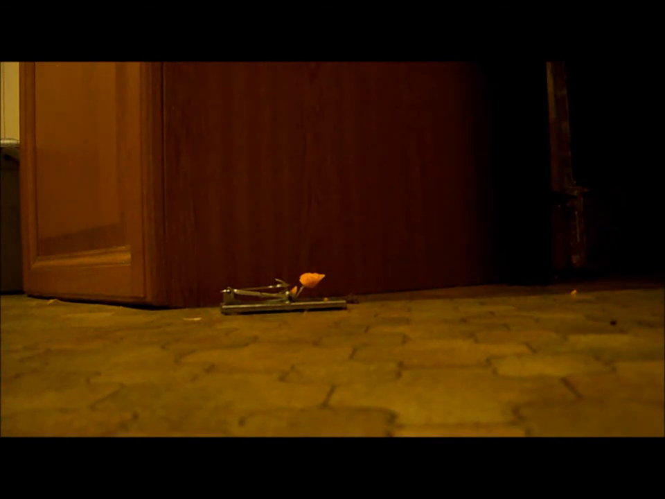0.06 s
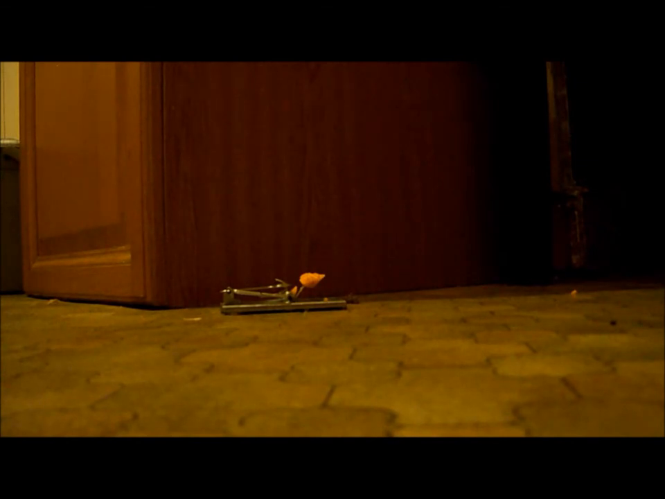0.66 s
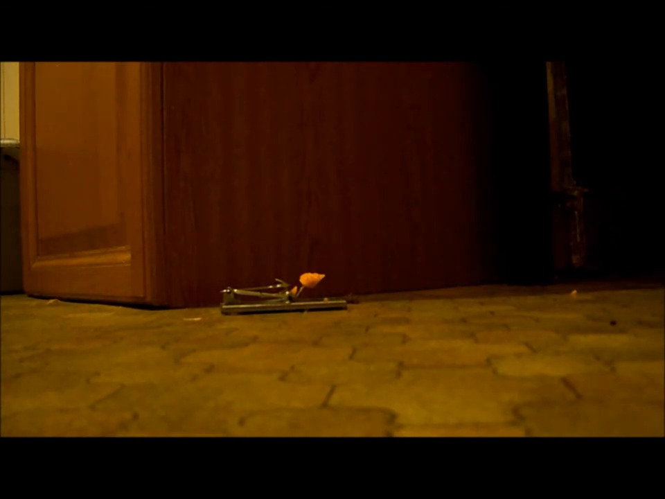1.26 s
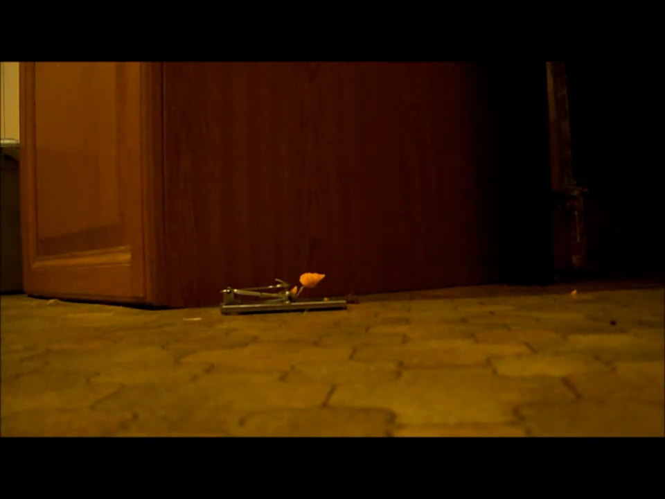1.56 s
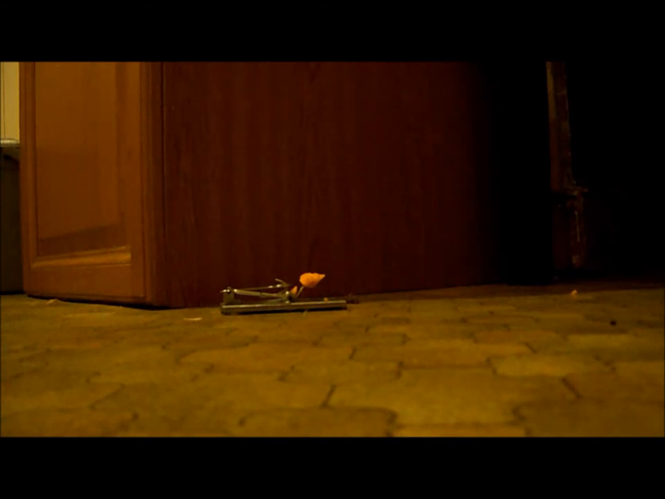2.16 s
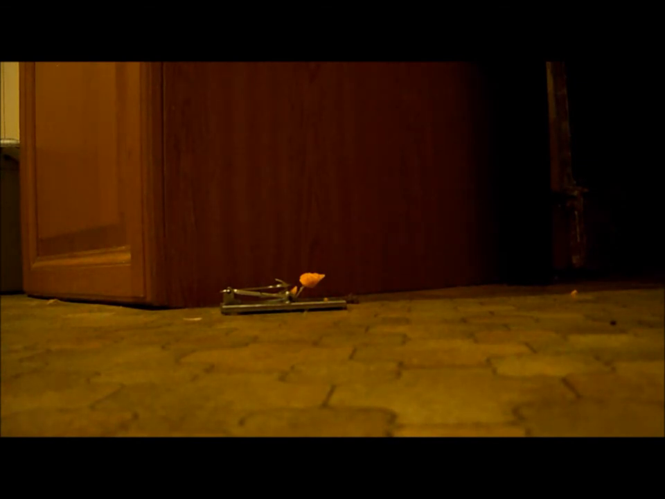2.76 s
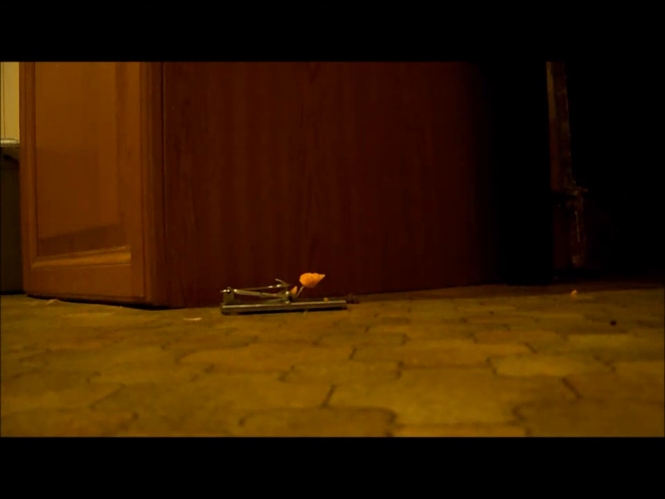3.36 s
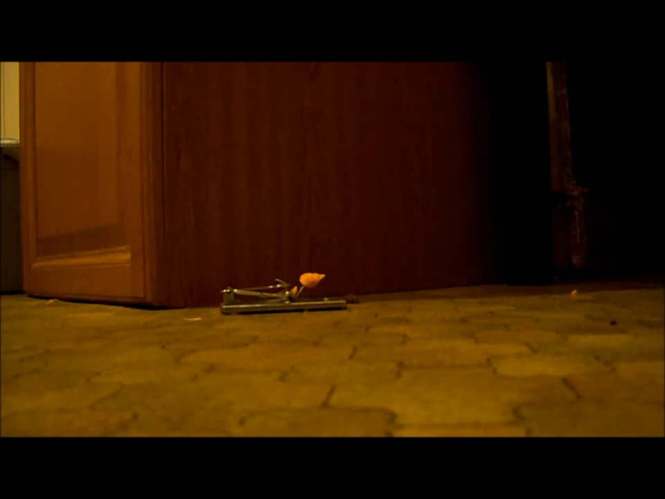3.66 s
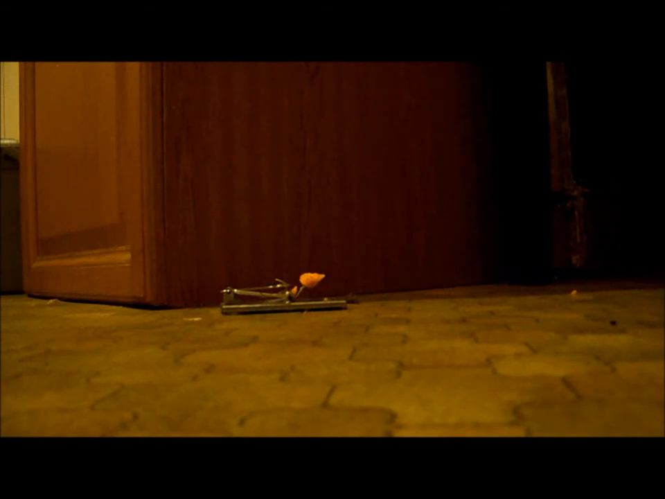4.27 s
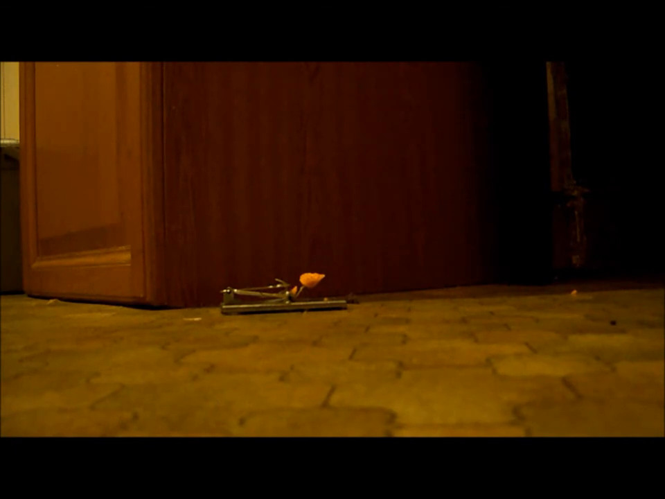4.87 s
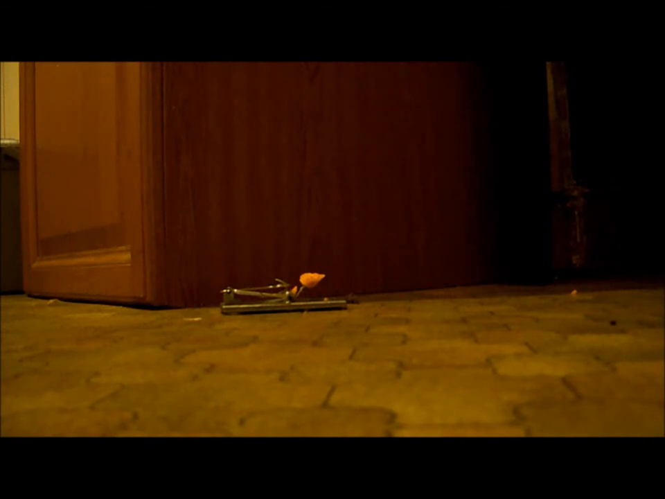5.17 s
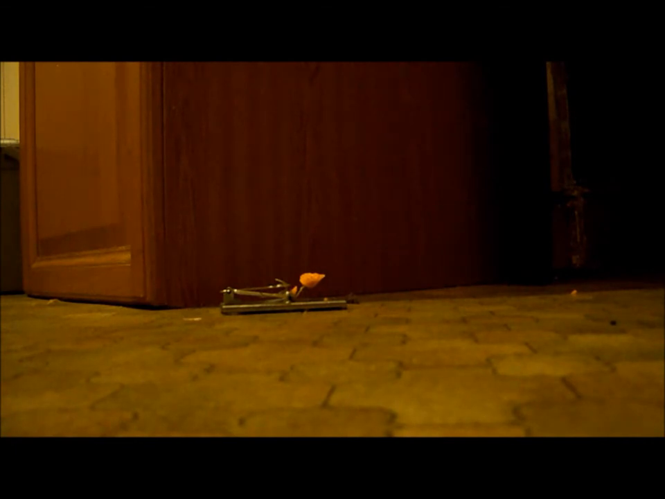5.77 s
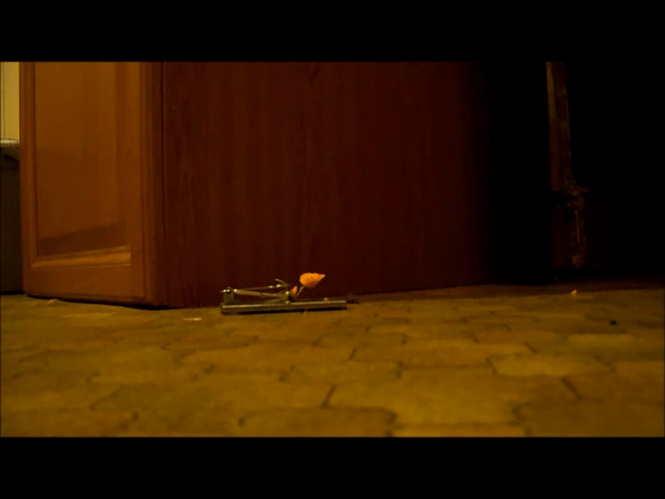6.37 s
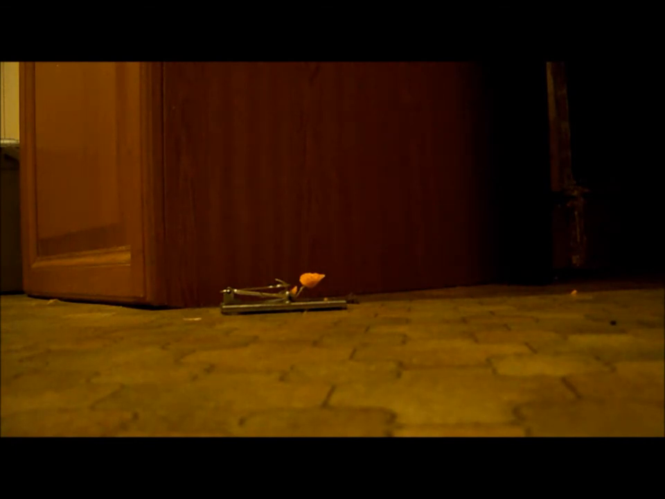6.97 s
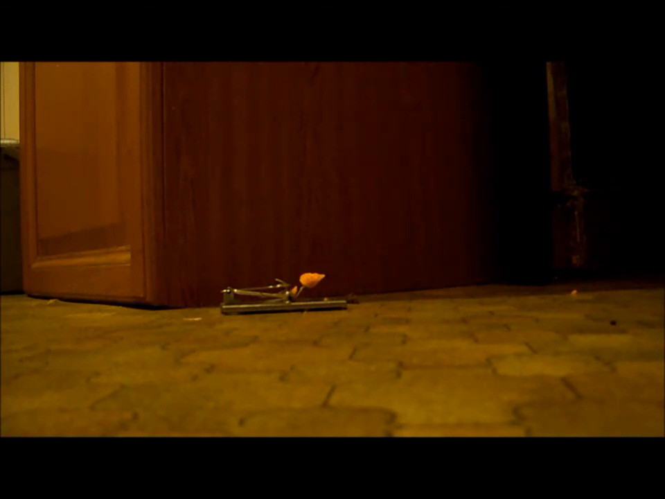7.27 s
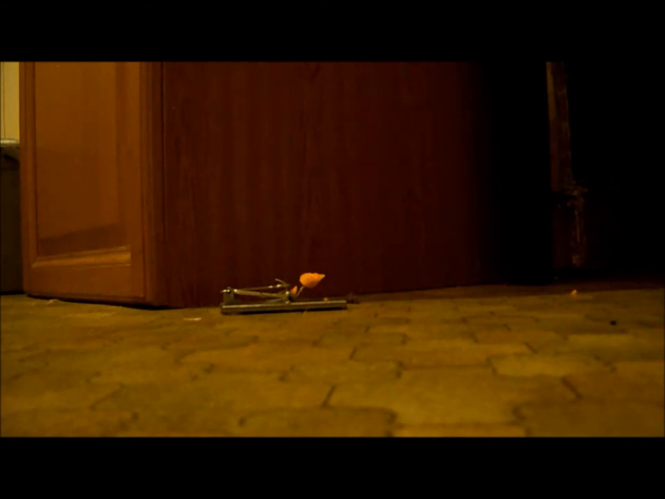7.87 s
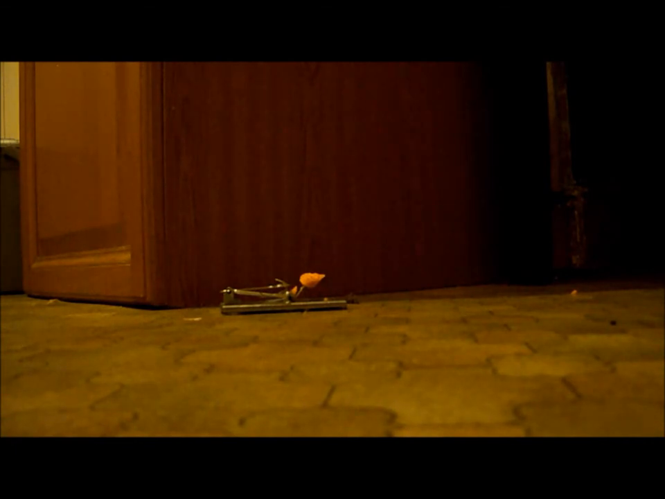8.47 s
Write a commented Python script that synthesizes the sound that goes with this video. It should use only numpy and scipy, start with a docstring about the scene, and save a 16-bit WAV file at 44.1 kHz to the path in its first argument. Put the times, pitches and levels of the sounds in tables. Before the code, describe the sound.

A low, continuous fridge hum carries through a still kitchen, picked up near the floor from a short distance. The motor tones throb slightly while moving air rings softly in the cabinet and room. Faint steady whines and thin microphone hiss lie above it. Now and then the hum swells briefly or takes on a hollow note, with a single barely audible squeak midway.

```python
"""A refrigerator in a quiet kitchen

It runs steadily, heard from the floor a little way off. Its compressor (the pump) and fan turn just
under the rate of the mains power, so their tones beat against each other. Air rushes through the
resonances of cabinet and room. There are faint whines, hollow hums, soft surges and one tiny squeak.
The microphone adds a thin hiss."""
import sys
import numpy as np
from scipy import signal
from scipy.fft import rfft, irfft
from scipy.io import wavfile

SR = 44100
rng = np.random.default_rng(int(sys.argv[2]) if len(sys.argv) > 2 else 0)


def unload_audio(sound):
    """Save the sound as a 16-bit wav file, at the path given as the first command line argument."""
    columns = np.transpose(np.atleast_2d(sound))
    # keep every value between -1 and 1, then stretch to whole-number steps
    steps = np.round(np.clip(columns, -1, 1) * 32767)
    wavfile.write(sys.argv[1], SR, steps.astype(np.int16))


N = 384552
FREQS = np.maximum(np.arange(N // 2 + 1) * SR / N, 1)
TIME = np.arange(N) / SR
MAINS_HZ, COMPRESSOR_HZ, FAN_HZ = 50.07, 49.14, 42.71

# tones of the piston strokes: (multiple of the compressor's turning rate, level/dB)
PISTON_TONES = [(1, -39.5), (3, -51), (4, -64.5), (5, -60.5), (6, -59.5), (7, -63.5), (8, -67), (9, -67),
                (12, -82), (14, -77), (15, -78.5)]
# hum from the magnetic pull on the motor's iron: (multiple of the mains rate, level/dB)
IRON_TONES = [(2, -48), (6, -62)]
# tones of the four-bladed fan: (multiple of the fan's turning rate, level/dB)
BLADE_TONES = [(1, -63.5), (3, -59), (4, -47), (5, -66), (8, -65), (12, -70.5)]
# the off-centre fan rotor varies the magnetic pull: (mains multiple, fan multiple, level/dB)
ROTOR_TONES = [(2, 1, -51.5), (4, 1, -58), (6, -1, -59.5)]
# broad rush of moving air: (f/Hz, level/dB per Hz)
AIR_SPECTRUM = [(12, -65.5), (30, -72), (110, -77), (400, -78.5), (680, -84), (900, -89.5), (1200, -91.5),
                (1650, -92), (1900, -96.5), (2700, -97), (3050, -105), (3550, -110.5), (4100, -121),
                (8000, -140)]
# pitches at which cabinet and room ring: (f/Hz, width/Hz, peak level/dB per Hz)
RESONANCES = [(138, 8.3, -72.5), (163.2, 6.2, -67.5), (182.6, 15, -63.5), (200.9, 15.6, -61.5),
              (229.1, 7.6, -61.5), (249.6, 30, -71), (283.8, 10, -68.5), (340, 26, -74.5),
              (380.6, 37.6, -74), (545, 50, -84.5), (757.4, 60, -79.5), (822, 46.4, -79.5), (1012, 80, -88),
              (1368, 68, -92.5), (2110, 150, -94.5), (2374, 110, -92.5), (2535, 240, -96),
              (2746, 87, -99.5)]
# faint steady whines: (f/Hz, level/dB)
WHINE_TONES = [(818.3, -72), (1056.6, -74.5), (1077.1, -77.5), (2014.8, -84), (6005.9, -89),
               (7830.7, -92.5)]
# faint hollow hums: (middle t/s, length/s, f/Hz, level/dB)
HOLLOW_HUMS = [(1.417, 0.073, 545, -56), (2.303, .5, 575, -60.5), (4.775, .13, 574, -52),
               (6.535, .16, 522, -55)]
# soft surges of the low rush: (middle t/s, level/dB)
LOW_SURGES = [(1.5, -44.5), (4.024, -43.5), (5.62, -42.5)]
# fine grain that flickers with the hum: (f/Hz, level/dB per Hz relative to the size of the sound)
GRAIN_SPECTRUM = [(7400, -75.5), (8100, -97.5)]
# microphone hiss: (f/Hz, level/dB per Hz)
HISS_SPECTRUM = [(1000, -120), (4200, -122), (5300, -109.5), (5800, -102.3), (6250, -104.8), (6600, -101.2),
                 (6950, -103.7), (7400, -104.3), (7700, -109.5), (8000, -123), (8250, -131)]


def undb(db):
    """Turn decibels into a number to multiply by."""
    return 10 ** (np.asarray(db) / 20)


def noise(gain):
    """Noise whose strength (amplitude per root Hz) follows gain over FREQS."""
    return irfft(rfft(rng.standard_normal(N)) * gain, N) * np.sqrt(SR / 2)


def colour(points):
    """A gain curve that joins (f/Hz, level/dB) points on a log-frequency axis."""
    hz, db = np.transpose(points)
    return undb(np.interp(np.log(FREQS), np.log(hz), db))


def resonance(hz, width_hz):
    """A steep-sided peak with gain 1 at its centre."""
    return 1 / np.sqrt(1 + (2 * (FREQS - hz) / width_hz) ** 4)


def wander(rate_hz):
    """A smooth random wobble with spread 1; a higher rate makes it quicker."""
    bin_hz = np.arange(len(FREQS)) * SR / N
    wobble = noise(1 / (1 + (bin_hz / rate_hz) ** 4))
    return (wobble - wobble.mean()) / wobble.std()


def rotation(hz, drift):
    """The angle of something turning, whose speed strays by the small fraction drift."""
    return 2 * np.pi * np.cumsum(hz * (1 + drift * wander(.5))) / SR


def tone(angle, db):
    """A pure tone of the given average (rms) level, starting anywhere in its cycle."""
    return np.sqrt(2) * undb(db) * np.sin(angle + rng.uniform(0, 2 * np.pi))


def harmonics(angle, tones):
    """Tones locked to whole multiples of one rotation."""
    return sum(tone(round(multiple) * angle, db) for multiple, db in tones)


def swell(middle_s, length_s, hz, width_hz, db):
    """A narrow band of noise that rises to its level and sinks again smoothly."""
    band = noise(resonance(hz, width_hz))
    rise_and_fall = np.exp(-2 * ((TIME - middle_s) / length_s) ** 2)
    return undb(db) * band / band.std() * rise_and_fall


def compressor(mains_angle):
    """The piston drones once per turn while the motor's iron hums at twice the mains rate."""
    shaft_angle = rotation(COMPRESSOR_HZ, drift=.00022)
    piston = harmonics(shaft_angle, PISTON_TONES) * undb(.15 * wander(2.4))
    iron = harmonics(mains_angle, IRON_TONES) * undb(.28 * wander(4.8))
    return piston + iron


def fan(mains_angle):
    """Blade tones flutter in the uneven air; the rotor adds tones on either side of the mains hum."""
    shaft_angle = rotation(FAN_HZ, drift=.0004)
    blades = harmonics(shaft_angle, BLADE_TONES) * undb(.52 * wander(4))
    rotor = sum(tone(round(m) * mains_angle + round(k) * shaft_angle, db) for m, k, db in ROTOR_TONES)
    return blades + rotor


def airflow():
    """Swirling air makes cabinet and room ring, each resonance wavering a little on its own."""
    rush = noise(colour(AIR_SPECTRUM)) * undb(.25 * wander(3.4))
    ringing = sum(noise(undb(db) * resonance(hz, width_hz)) * undb(.6 * wander(2.3))
                  for hz, width_hz, db in RESONANCES)
    return (rush + ringing) * undb(.19 * wander(.42))


def whines():
    """Faint high tones hold almost perfectly steady."""
    return sum(tone(rotation(hz, drift=.0001), db) for hz, db in WHINE_TONES)


def hollow_hums():
    """A hollow note sounds faintly now and then, never quite at the same pitch."""
    return sum(swell(t, length_s, hz, width_hz=50, db=db) for t, length_s, hz, db in HOLLOW_HUMS)


def surges():
    """The low rush swells briefly now and then, always at the same pitch."""
    return sum(swell(t, length_s=.1, hz=212, width_hz=55, db=db) for t, db in LOW_SURGES)


def squeak():
    """One thin, nearly pure squeak, just louder than the rush."""
    return swell(middle_s=4.705, length_s=.13, hz=2735, width_hz=50, db=-66.5)


def scene():
    """The refrigerator and the air around it, in one channel."""
    mains_angle = rotation(MAINS_HZ, drift=.0001)
    steady = compressor(mains_angle) + fan(mains_angle) + airflow() + whines()
    return (steady + hollow_hums() + surges() + squeak())[None]


def record(dry):
    """A fine grain rides on the hum's peaks, the microphone hisses, and the highest treble is cut."""
    grain = np.abs(dry) * noise(colour(GRAIN_SPECTRUM))
    hiss = noise(colour(HISS_SPECTRUM))
    low_pass = signal.ellip(10, .1, 80, 8200, fs=SR, output="sos")  # steep cut above 8200 Hz
    return signal.sosfilt(low_pass, dry + hiss + grain)


dry = scene()
out = record(dry)
unload_audio(out)
```